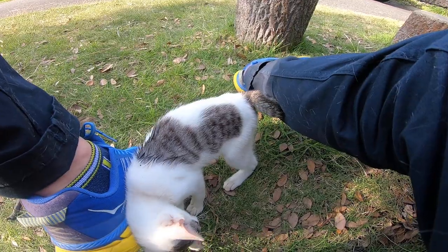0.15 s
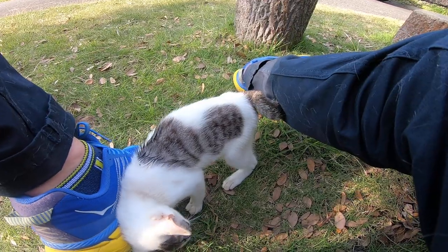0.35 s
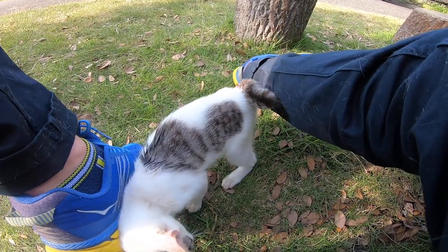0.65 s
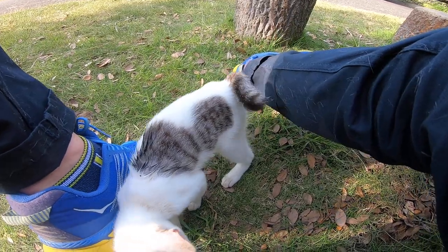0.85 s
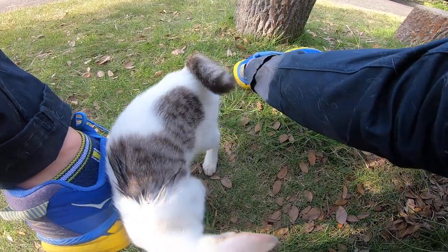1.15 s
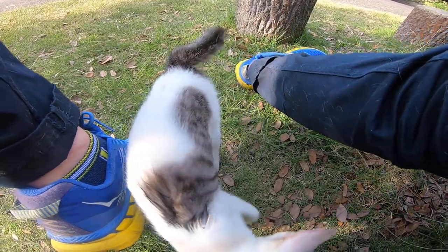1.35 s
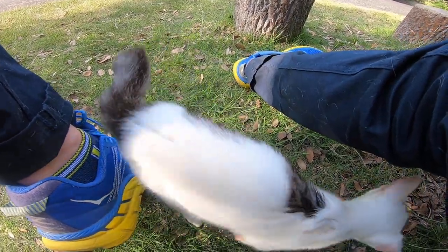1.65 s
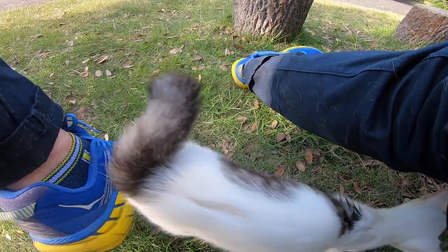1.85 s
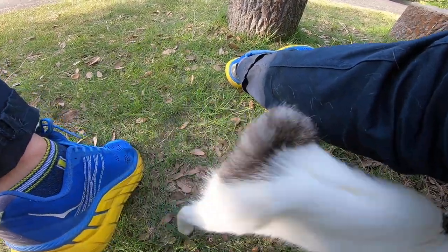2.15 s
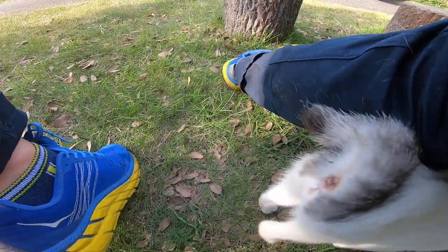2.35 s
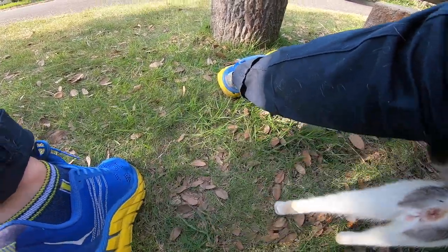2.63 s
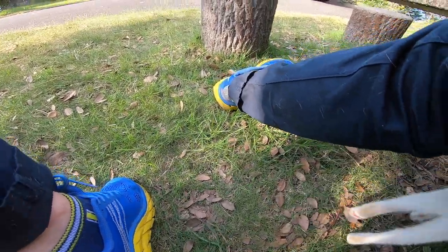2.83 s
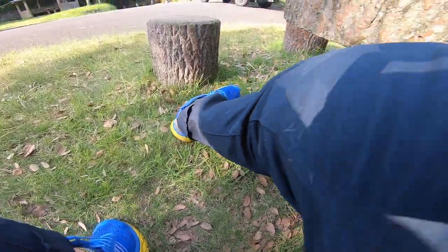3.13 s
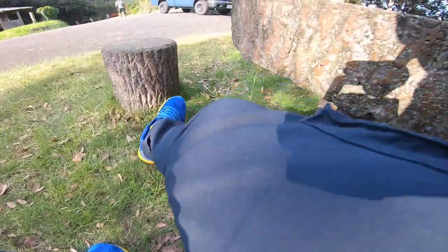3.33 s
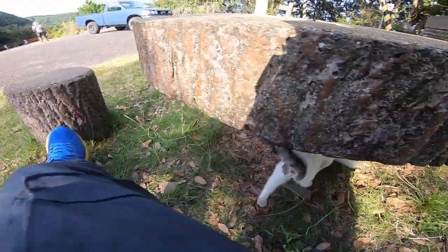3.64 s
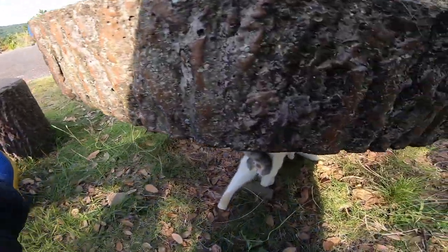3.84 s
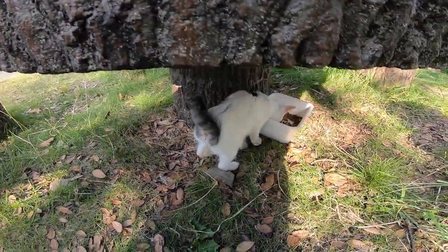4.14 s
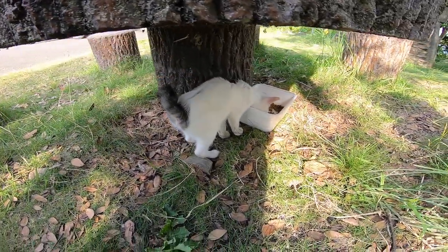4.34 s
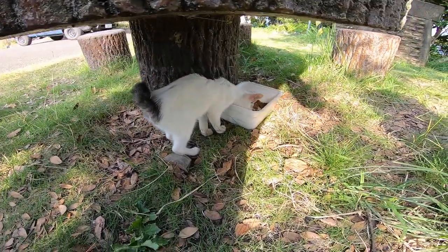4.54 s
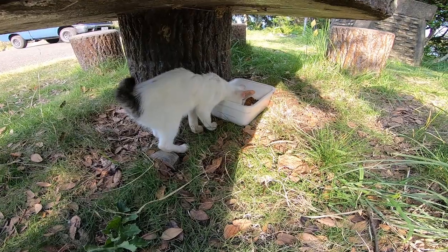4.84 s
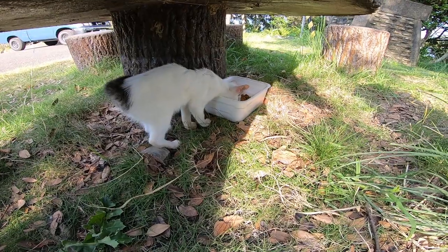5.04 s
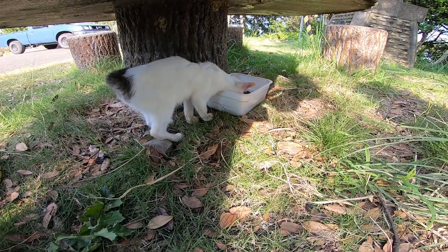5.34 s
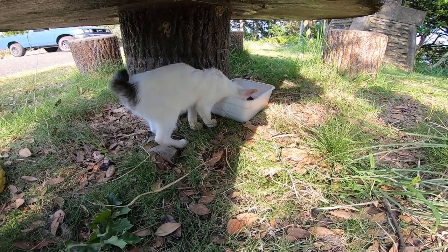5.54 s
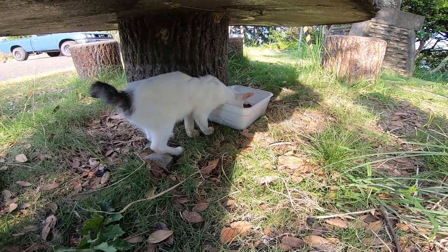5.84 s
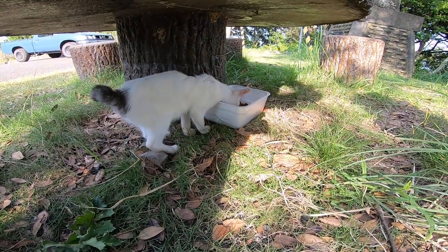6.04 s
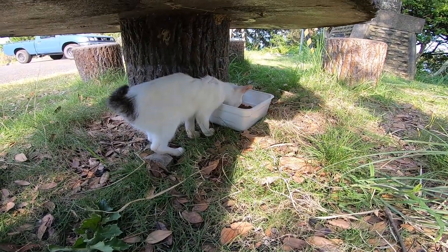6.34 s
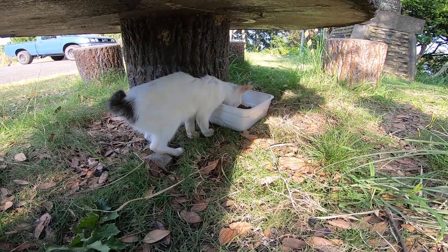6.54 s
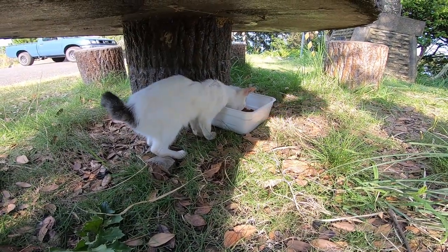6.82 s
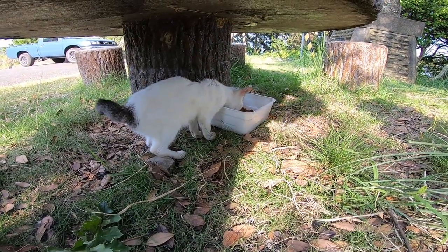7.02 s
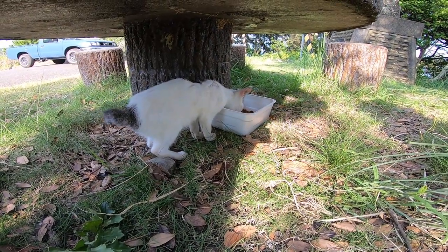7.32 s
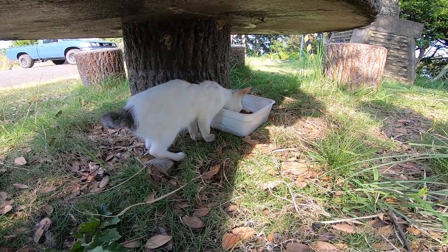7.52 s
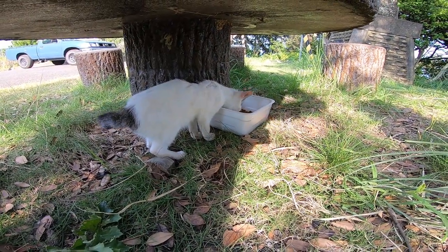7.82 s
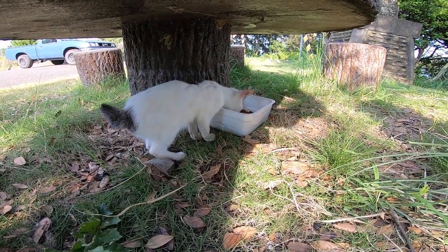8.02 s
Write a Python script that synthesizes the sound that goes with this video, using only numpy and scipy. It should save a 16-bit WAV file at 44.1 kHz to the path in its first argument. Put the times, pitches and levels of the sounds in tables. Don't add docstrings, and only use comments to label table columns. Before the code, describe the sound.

Shrill cicadas buzz steadily, growing nearer and pulsing after three seconds, with soft wind bumps, dry leaf snaps and a dull camera knock.

```python
import sys
import numpy as np
from scipy import signal
from scipy.fft import rfft, irfft, next_fast_len
from scipy.io import wavfile
from scipy.ndimage import uniform_filter1d

SR = 44100
rng = np.random.default_rng(int(sys.argv[2]) if len(sys.argv) > 2 else 0)


def dump(signal):
    limited = np.clip(np.atleast_2d(signal).T, -1, 1)
    pcm = np.round(limited * 32767).astype(np.int16)
    wavfile.write(sys.argv[1], SR, pcm)


def voltage_ratio(level):
    return 10 ** (np.asarray(level, float) / 20)


N = 360498
UNLIKE = -0.13


def curves(table):
    s, *columns = np.transpose(table)
    return [np.interp(np.arange(N) / SR, s, c) for c in columns]


def unit(x):
    return x / np.sqrt(np.mean(x ** 2))


def shape(x, gain):
    size = next_fast_len(N)
    hz = np.arange(size // 2 + 1) * SR / size + 1e-3
    return unit(irfft(rfft(x, size) * gain(hz), size)[..., :N])


def ring(x, mode):
    hz, width, db = mode
    return voltage_ratio(db) * np.std(x) * shape(x, lambda f: 1 / (1 + (2 * (f - hz) / width) ** 2) ** 1.623)


def walk(rate):
    k = int(SR / rate)
    steps = np.repeat(rng.standard_normal(N // k + 1), k)
    return 1.2 * uniform_filter1d(uniform_filter1d(steps, k), k)[:N]


def pair(likeness):
    mid, side = rng.standard_normal((2, N))
    c = np.clip(likeness, -1, 1)
    return np.sqrt((1 + c) / 2) * mid + np.sqrt((1 - c) / 2) * side * np.array([[1], [-1]])


def pan(db):
    return voltage_ratio(np.array([db, -db]).reshape(2, -1) / 2)


def pumping(lead_s):
    # t/s of the crest, swing/dB
    pumps = [(3.3, -2), (3.48, 1), (3.66, 1.2), (3.87, 0.5), (4.06, 1), (4.28, 1), (4.47, 1.7), (4.7, 0.8),
             (4.88, 1.5), (5.07, 0.7), (5.27, 1), (5.47, 0.8), (5.68, 0.8), (5.86, 1), (6.01, 1.3),
             (6.22, 0.9), (6.43, 0.8), (6.67, 0.5), (6.87, 0), (7.06, -0.7), (7.27, -0.2), (7.48, 0.5),
             (7.7, 0.5), (7.93, -0.2), (8.17, -0.5)]
    s, swing_db = np.transpose(pumps)
    t = np.arange(N) / SR + lead_s
    turns = np.interp(t, s, np.arange(len(s)))
    return (t > s[0]) * np.interp(t, s, swing_db) * np.cos(2 * np.pi * turns)


def strokes(click_hz):
    rib_count, memory, muscle_depth = 7, 0.78, 0.057
    turns = np.cumsum(click_hz * (1 + .002 * walk(6)) / rib_count / SR)
    size = int(SR * rib_count / click_hz.mean())
    fresh = pair(UNLIKE)[:, :N // size * size].reshape(2, -1, size)
    pattern = signal.lfilter([1], [1, -memory], fresh, axis=1)
    row = np.minimum(turns.astype(int), pattern.shape[1] - 1)
    crackle = pattern[:, row, (turns % 1 * size).astype(int)]
    clicks = np.exp(-(turns * rib_count % 1) / 0.28)
    return unit(crackle * clicks * (1 + muscle_depth * np.cos(2 * np.pi * turns)))


def low_drone(pan_db):
    # t/s, level/dB
    low = [(0, -54), (1, -51.5), (1.6, -51), (2.2, -48), (3.3, -47.5), (3.8, -46.5), (4.5, -46.5),
           (5.3, -45), (6.2, -43.5), (6.35, -46.5), (7.2, -48), (8.17, -48)]
    (drone_db,) = curves(low)
    drone = ring(pair(UNLIKE), (6054, 1820, 0))
    return drone * voltage_ratio(drone_db + 1.0 * walk(7.3)) * pan(2.5 + 0.21 * pan_db)


def chorus():
    # t/s, level/dB, belly opening/dB, near singer share/0-1, left minus right/dB
    facing = [(0, -41.5, -7.5, 0, -1.5), (1, -44, -2.5, 0.07, -.5), (2.05, -44, -2.5, 0.1, .4),
              (2.8, -45.5, -1.5, 0, 1), (3.3, -43.5, -3, 0.07, -2), (3.6, -38.5, -6, .25, -2.5),
              (3.95, -34.5, -9, 0.4, -4.5), (4.5, -34.5, -5, 0.45, -2), (5.3, -35.5, -5.5, .35, -2.5),
              (6.2, -35, -5, .27, -3), (6.6, -35.5, -5.5, 0.14, -3.3), (7.3, -35.5, -7, 0.2, -3),
              (8.17, -36.5, -4.5, 0.24, -3)]
    # t/s, level/dB
    higher = [(0, -50.5), (1, -54), (1.85, -49), (2.3, -56.5), (3.1, -54), (4, -49), (4.5, -46.5),
              (5.2, -47.5), (6.08, -49), (6.3, -42), (6.9, -41.5), (8.17, -40)]
    slow_db, belly_db, share, pan_db = curves(facing)
    (edge_db,) = curves(higher)
    main_db = slow_db + pumping(0)
    belly_db = belly_db + pumping(0.02)

    click_hz = 516 - 5.3 * (np.clip(np.arange(N) / SR, 3, 7.3) - 3)
    share = np.clip(share, 0, 1)
    near = np.sqrt(share) * strokes(click_hz)
    blur = np.sqrt(1 - share) * pair(UNLIKE) * voltage_ratio(0.27 * walk(25))
    drive = near + blur
    tymbals = ring(near, (8110, 1360, -2.5)) + ring(blur, (8670, 1680, -1.2))
    belly = voltage_ratio(belly_db) * ring(drive, (7400, 2120, -2.97))
    edge = ring(drive, (9480, 1200, -5.5))
    body = voltage_ratio(main_db) * (tymbals + belly) + voltage_ratio(edge_db) * edge

    far = pair(UNLIKE) * voltage_ratio(1.2 * walk(15))
    overtone = ring(far, (14600, 3500, -2.5))
    leak = ring(far, (10700, 3500, 1.5))
    over = np.hypot(voltage_ratio(main_db - 28.5), voltage_ratio(edge_db - 24.5))
    top = over * (overtone + leak) * pan(0.7 * pan_db)
    return voltage_ratio(3.5) * pan(pan_db) * (body + top) + low_drone(pan_db)


def wind(noise):
    # t/s, peak/dB, length/s
    gusts = [(.4, -46.5, 0.23), (.8, -57, .12), (1.12, -62, .25), (1.55, -60, 0.09), (2.136, -53, 0.18),
             (2.44, -53, .2), (2.72, -55, 0.11), (2.859, -55, .06), (3.06, -53, .12), (3.424, -56, .2),
             (3.82, -57, .1), (3.995, -50, .08), (4.3, -56, 0.18), (4.807, -61, 0.067), (5.14, -51, 0.1),
             (5.397, -54, .1), (5.95, -57, 0.08), (6.52, -58, 0.14), (7.42, -62, .15), (7.92, -68, 0.14)]
    t = np.arange(N) / SR
    level = voltage_ratio(-67)
    for s, db, length in gusts:
        level = level + voltage_ratio(db) * np.exp(-(2 * (t - s) / length) ** 2)
    return noise * level


def traffic(noise):
    # t/s, level/dB
    rumble = [
        (0, -44.5),
        (.75, -47),
        (1.7, -45),
        (2.1, -46),
        (3.4, -48),
        (3.6, -48.5),
        (5.6, -49),
        (6.4, -47.5),
        (7.5, -46.5),
        (8.17, -47),
    ]
    (rumble_db,) = curves(rumble)
    return noise * voltage_ratio(rumble_db + 0.85)


def handling(cloth, rustle):
    # t/s, effort over rest/dB
    stir = [(0, 1), (.5, -.5), (1.1, 1.5), (1.7, 0), (2.5, 0.5), (3.2, 1.5), (3.48, 5), (3.8, 2.5),
            (4.4, 2.5), (4.8, 1.5), (5.4, 2), (5.8, .3), (6.6, 0.7), (8.17, 0)]
    (stir_db,) = curves(stir)
    rubbing = cloth * voltage_ratio(-62 + 1.36 * stir_db + 1.5)
    rustling = rustle * voltage_ratio(-57.5 + 0.86 * stir_db + 2.1)
    return (rubbing + rustling) * pan(-2 + 0.71 * walk(4))


def air():
    # f/Hz, level/dB per Hz
    colour = [(8.8, -40), (15, -7.5), (54, -15), (79, -6), (117, -7.5), (153, 0), (238, -5), (327, -9),
              (509, -15.5), (650, -15.5), (771, -12), (1860, -15), (4280, -22.5), (5200, -34), (6760, -37),
              (11400, -120)]
    # f/Hz, likeness/0-1
    likeness = [(20, 0.66), (60, 0.97), (200, 0.99), (400, 0.91), (800, 0.2), (2000, 0.37), (3700, 0.61),
                (5000, 0.4)]
    colour_hz, colour_db = np.transpose(colour)
    like_hz, like = np.transpose(likeness)
    layers = [0, 0, 0, 0]
    for hz in 20 * 2 ** np.arange(0, 8.6, .5):
        noise = pair(np.interp(np.log(hz), np.log(like_hz), like))
        band = shape(noise, lambda f: np.exp(-(np.log2(f / hz) / 0.42) ** 2))
        db = np.interp(np.log(hz), np.log(colour_hz), colour_db) + 10 * np.log10(hz) + 1.37 * walk(9)
        k = int(hz > 75) + int(hz > 400) + int(hz > 800)
        layers[k] = layers[k] + voltage_ratio(db) * band
    gust_noise, rumble, cloth, rustle = map(unit, layers)
    return wind(gust_noise) + traffic(rumble) + handling(cloth, rustle)


def bird():
    # t/s, f/Hz, level/dB
    whistle = [
        (.15, 3700, -72),
        (.175, 3840, -70),
        (.195, 3850, -67),
        (.22, 3840, -69),
        (.235, 3400, -66),
        (.247, 2630, -64),
        (.262, 2790, -64),
        (.285, 3250, -69),
        (.3, 3350, -78),
    ]
    hz, db = curves(whistle)
    t = np.arange(N) / SR
    on = (t > whistle[0][0]) & (t < whistle[-1][0])
    return np.sqrt(2) * voltage_ratio(db) * on * np.sin(2 * np.pi * np.cumsum(hz) / SR) * pan(0.)


def low_singer(table, lines, pan_db, wobble, blur_hz):
    hz, db = curves(table)
    t = np.arange(N) / SR
    on = uniform_filter1d(1. * ((t > table[0][0]) & (t < table[-1][0])), size=1500)
    click_hz = hz / lines[0][0] * (1 + wobble * walk(30))
    phase = 2 * np.pi * np.cumsum(click_hz) / SR
    out = 0
    for k, line_db in lines:
        paths = [walk(blur_hz) * np.cos(k * phase) + walk(blur_hz) * np.sin(k * phase) for _ in range(2)]
        out = out + voltage_ratio(line_db) * np.array(paths)
    return out * on * voltage_ratio(db + 5) * pan(pan_db)


def rising_singer():
    # t/s, f/Hz of the tenth line, level/dB
    song = [
        (.6, 5250, -81),
        (1.2, 5330, -76),
        (1.8, 5450, -68),
        (2.2, 5470, -65),
        (2.8, 5540, -68),
        (3.4, 5640, -60),
    ]
    # multiple of the click rate, level/dB
    lines = [(10, 0), (11, 1), (12, -5)]
    return low_singer(song, lines, 2.7, 0.00314, 90.)


def ticks(table, partner_db, snap_db, top_hz, low_hz=900):
    out, t = np.zeros((2, N + 2000)), np.arange(2000) / SR
    band = signal.butter(2, [low_hz, top_hz], "bandpass", fs=SR, output="sos")
    grit = unit(signal.sosfilt(band, rng.standard_normal((len(table), 2000))))
    t60_s = 0.011
    fade = np.exp(-np.log(1000) * t / t60_s) * (1 - np.exp(-t / 0.00058))
    for (s, db, hz, pan_db), g in zip(table, grit):
        partner = np.sin(2 * np.pi * 0.596 * hz * t) * np.exp(t / 0.007)
        tick = np.sin(2 * np.pi * hz * t) + voltage_ratio(partner_db) * partner
        tick = (tick + voltage_ratio(snap_db) * g) * fade
        start = int(s * SR)
        out[:, start:start + 2000] += voltage_ratio(db) * np.outer(pan(pan_db), tick / np.abs(tick).max())
    return out[:, :N]


def leaf_snaps():
    # t/s, peak/dB, ring f/Hz, left minus right/dB
    snaps = [(1.0509, -48, 1480, -2), (1.1138, -50, 1260, -2), (2.0232, -39, 1420, 2),
             (2.0304, -39, 1520, 8), (2.2013, -36.5, 990, -12), (2.2093, -34, 1030, -2),
             (2.9556, -34, 1630, 9), (2.2582, -29.5, 3550, 6), (2.4627, -45, 961, -2.5),
             (3.1144, -40, 1303, -7), (3.3118, -42, 1340, -2), (4.2292, -43, 2200, -1.5),
             (4.3494, -41, 1950, 4), (4.39, -45, 1500, 0), (4.4332, -38.5, 4300, -.5), (4.46, -40, 2000, 0),
             (6.6168, -45, 1312, -2), (6.6896, -34, 2100, -.5), (6.9494, -40, 1890, -1),
             (7.1625, -44, 1740, -1.5)]
    return ticks(snaps, partner_db=-6, snap_db=2.5, top_hz=4590)


def paw_grit():
    # t/s, peak/dB, ring f/Hz, left minus right/dB
    grains = [
        (1.556, -42, 2730, -4.5),
        (1.5682, -41, 3500, -6),
        (1.5814, -41, 3300, -4.5),
        (1.589, -41, 3200, -4),
        (1.6176, -39.5, 2880, -8),
    ]
    return ticks(grains, partner_db=-20, snap_db=-2, top_hz=5000, low_hz=2500)


def twig_ticks():
    # t/s, peak/dB, ring f/Hz, left minus right/dB
    twigs = [
        (2.811, -24, 3410, 9),
        (6.5339, -38.5, 3380, 11),
        (6.541, -42, 3100, 11),
        (7.7294, -42, 3120, 1),
    ]
    return ticks(twigs, partner_db=-3, snap_db=-2, top_hz=6500)


def steady_singer():
    # t/s, f/Hz of the strongest line, level/dB
    song = [
        (3.2, 5560, -68),
        (3.5, 5540, -55),
        (3.9, 5530, -58.5),
        (4.3, 5540, -61),
        (4.7, 5550, -57),
        (5.3, 5550, -52.5),
        (5.8, 5550, -54.5),
        (6.2, 5575, -54),
        (6.3, 5580, -56),
    ]
    # multiple of the click rate, level/dB
    lines = [(11, 0), (10, -11), (12, -4)]
    return low_singer(song, lines, 3.15, .002, 80.)


def camera_knock():
    # t/s, peak/dB, ring f/Hz, left minus right/dB
    knock = [
        (3.4675, -33.5, 750, -7),
    ]
    return ticks(knock, partner_db=-6, snap_db=-9, top_hz=2000)


def third_singer():
    # t/s, f/Hz of the strongest line, level/dB
    song = [
        (4.05, 5820, -67),
        (4.3, 6130, -58),
        (4.8, 6170, -55),
        (5.4, 6170, -53),
        (5.9, 6120, -60),
        (6.2, 6100, -66),
    ]
    # multiple of the click rate, level/dB
    lines = [(10, 0), (9, -2), (11, -13)]
    return low_singer(song, lines, 0.5, .008, 400.)


def scene():
    singers = rising_singer() + steady_singer() + third_singer()
    paws = leaf_snaps() + paw_grit() + twig_ticks()
    return chorus() + air() + bird() + singers + paws + camera_knock()


def low_pass(x):
    return signal.sosfilt(signal.butter(12, 15760, fs=SR, output="sos"), x)


def record(dry):
    return low_pass(dry)


dry = scene()
out = record(dry)
dump(out)
```